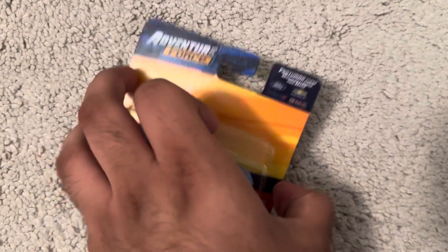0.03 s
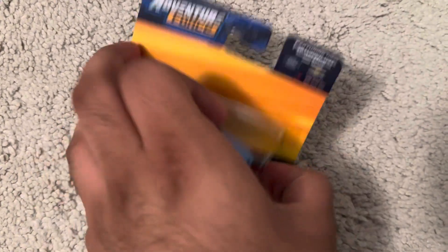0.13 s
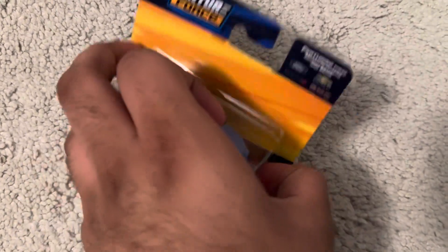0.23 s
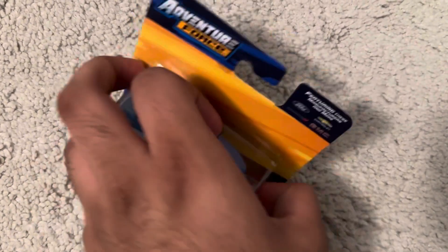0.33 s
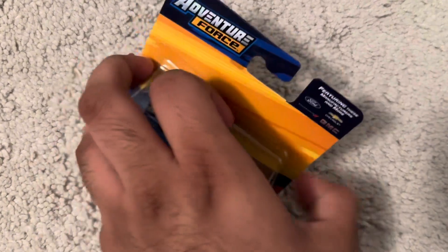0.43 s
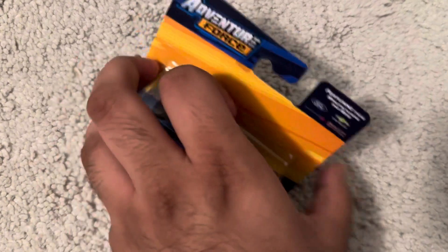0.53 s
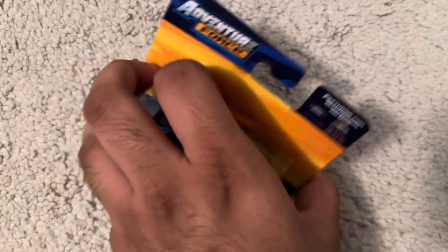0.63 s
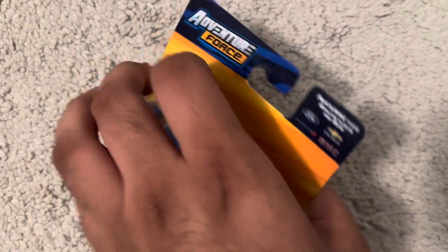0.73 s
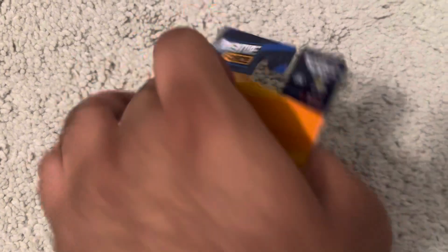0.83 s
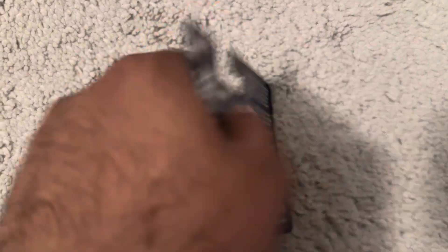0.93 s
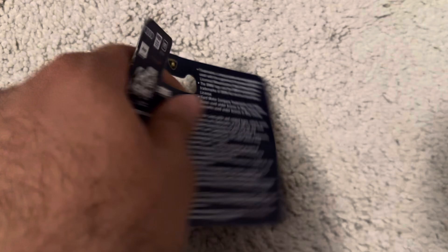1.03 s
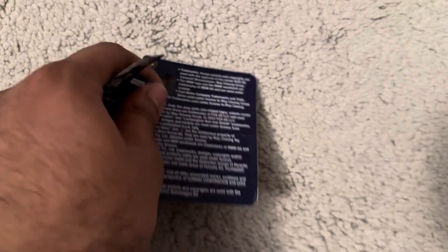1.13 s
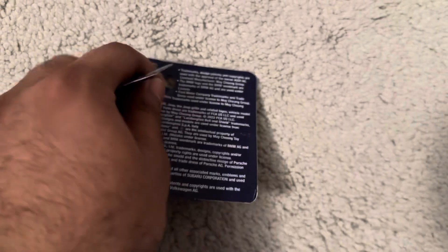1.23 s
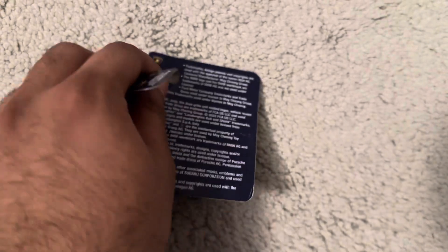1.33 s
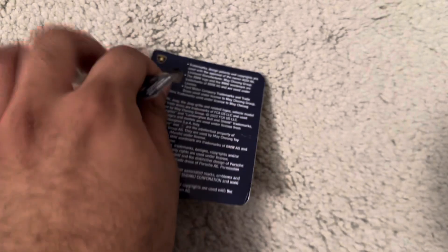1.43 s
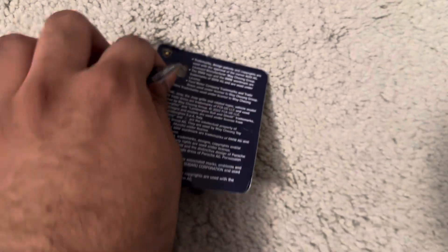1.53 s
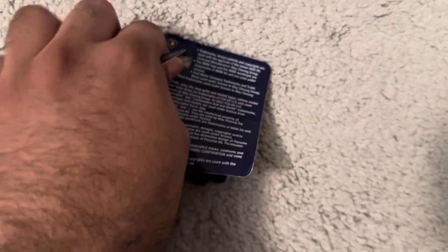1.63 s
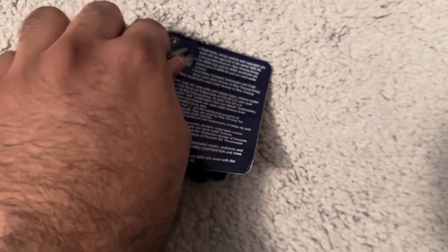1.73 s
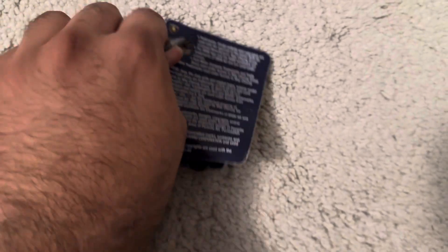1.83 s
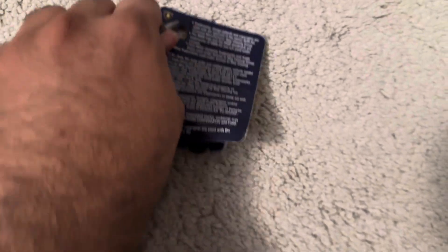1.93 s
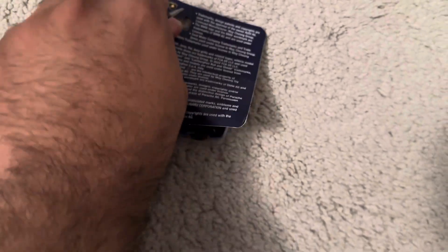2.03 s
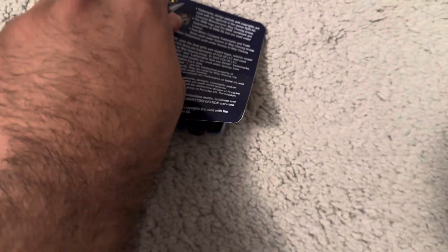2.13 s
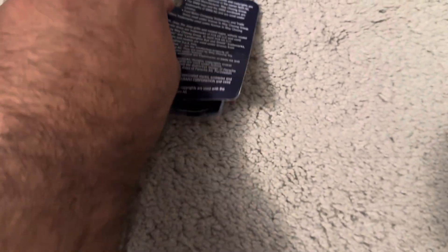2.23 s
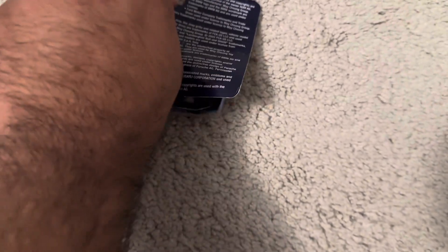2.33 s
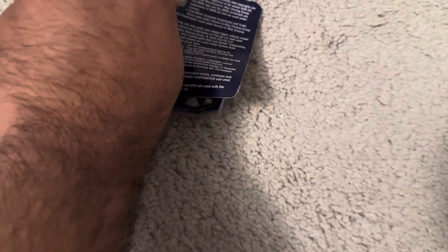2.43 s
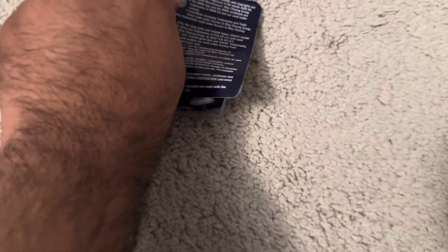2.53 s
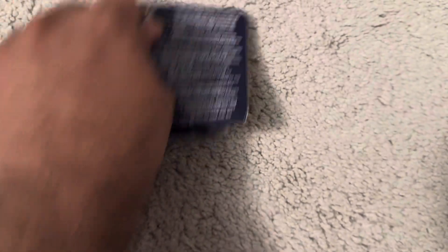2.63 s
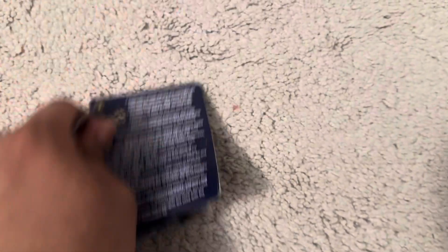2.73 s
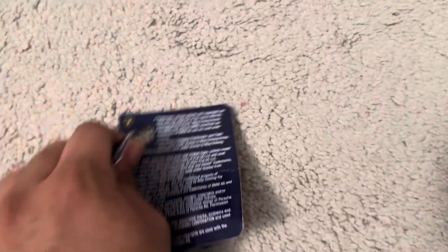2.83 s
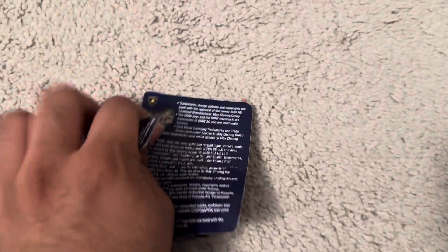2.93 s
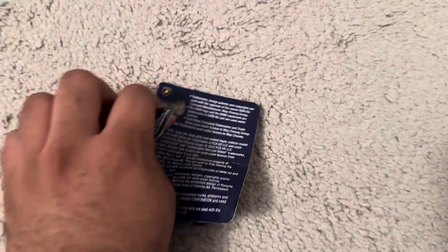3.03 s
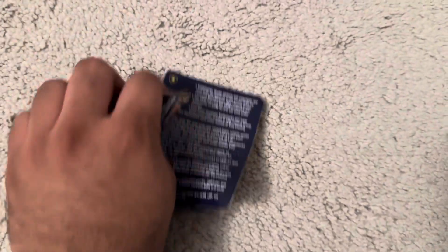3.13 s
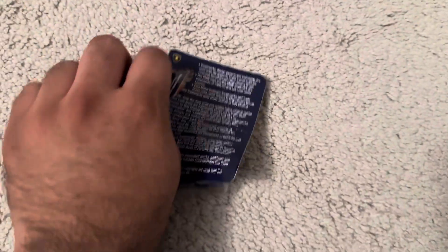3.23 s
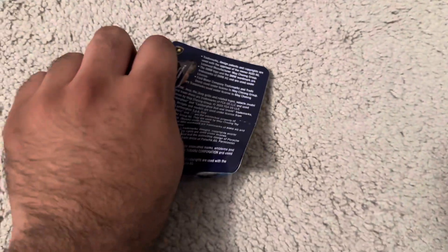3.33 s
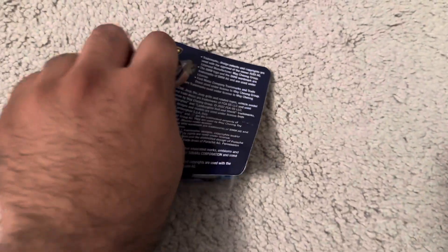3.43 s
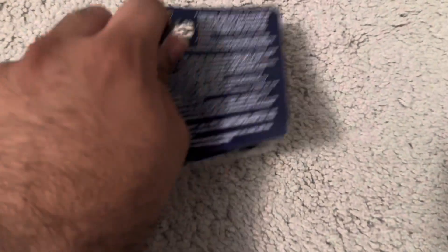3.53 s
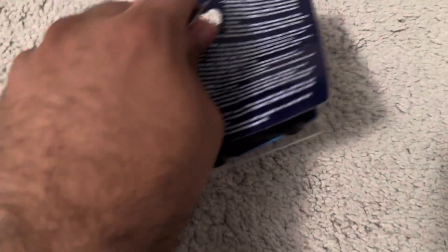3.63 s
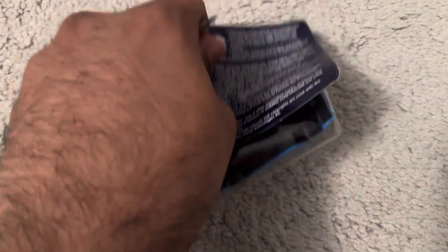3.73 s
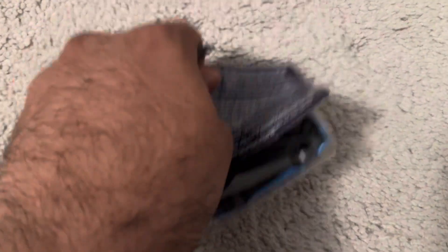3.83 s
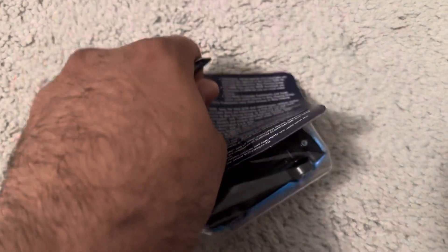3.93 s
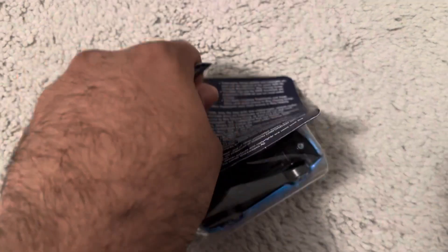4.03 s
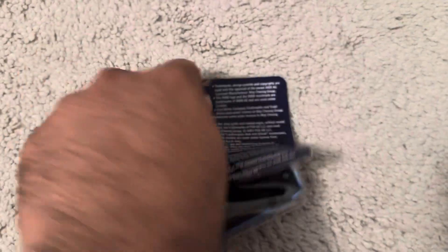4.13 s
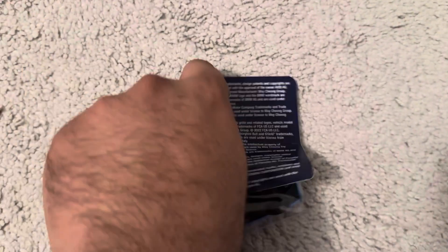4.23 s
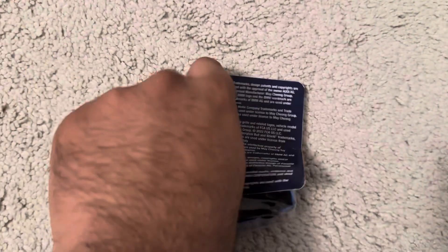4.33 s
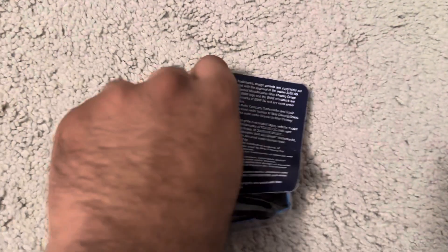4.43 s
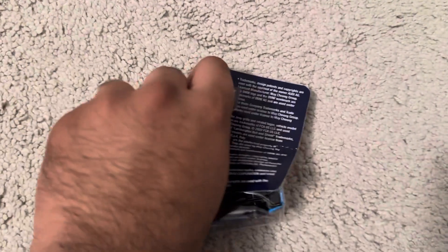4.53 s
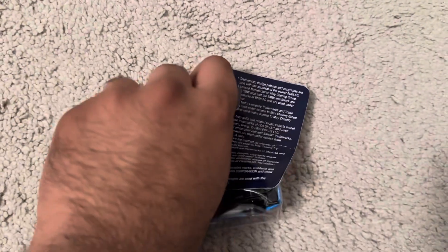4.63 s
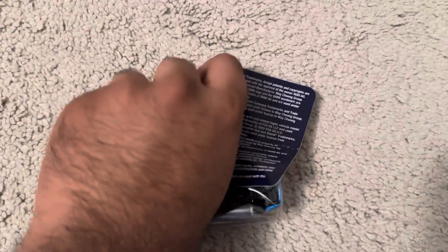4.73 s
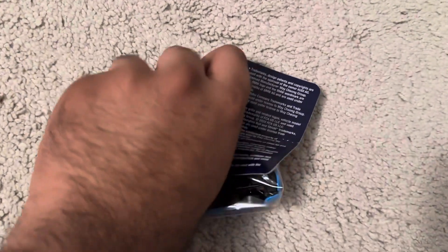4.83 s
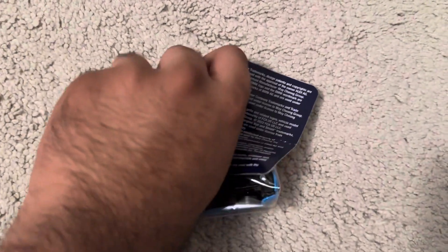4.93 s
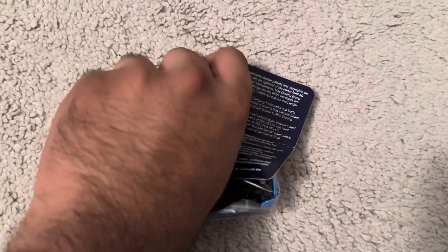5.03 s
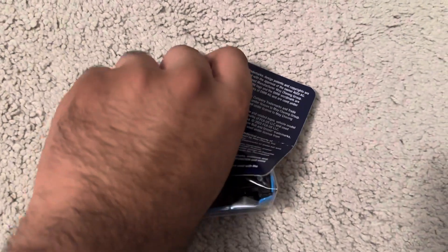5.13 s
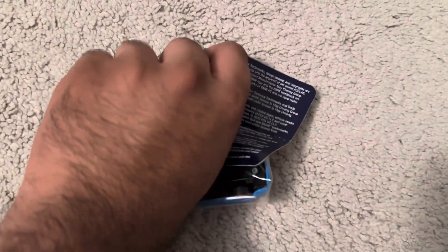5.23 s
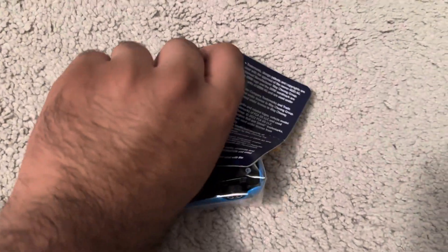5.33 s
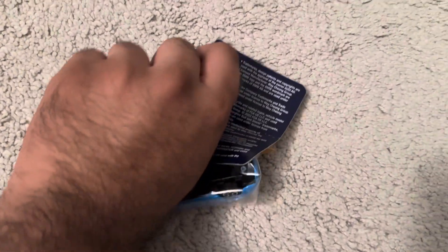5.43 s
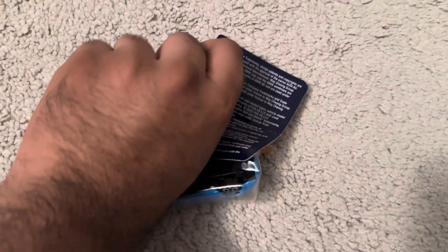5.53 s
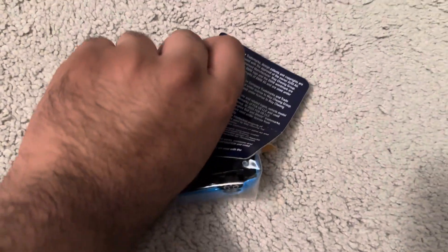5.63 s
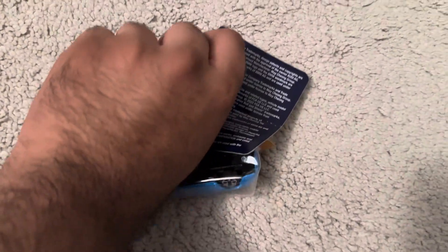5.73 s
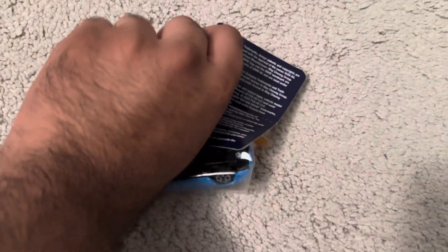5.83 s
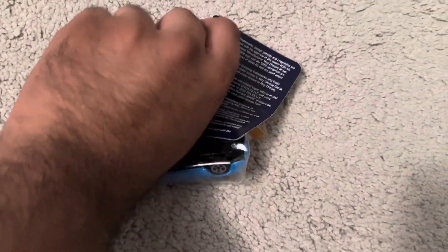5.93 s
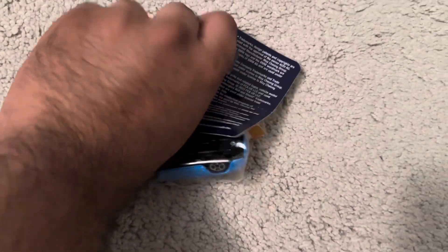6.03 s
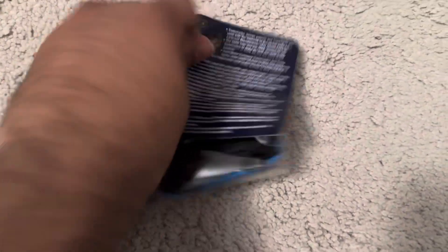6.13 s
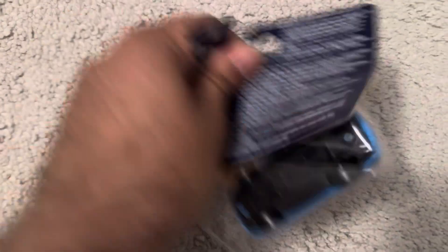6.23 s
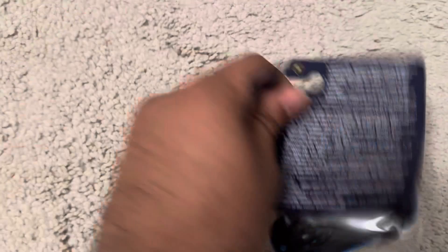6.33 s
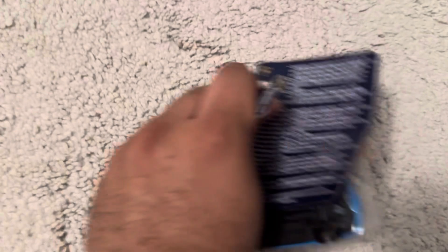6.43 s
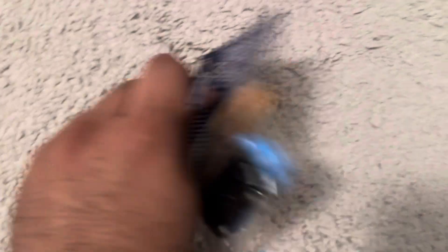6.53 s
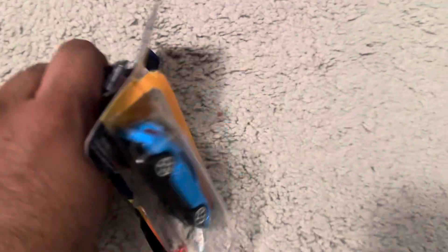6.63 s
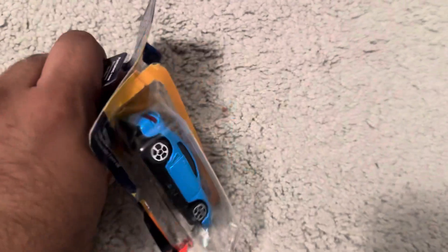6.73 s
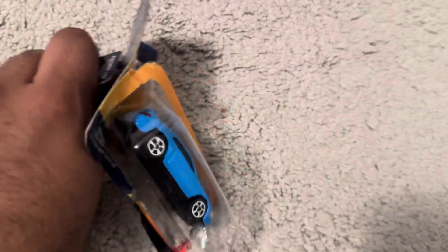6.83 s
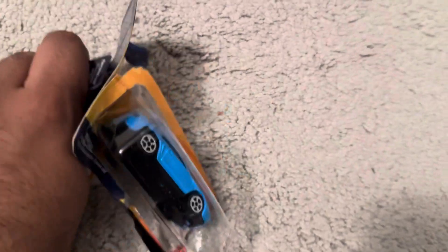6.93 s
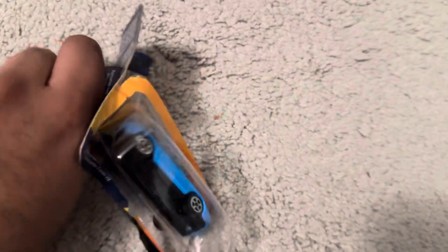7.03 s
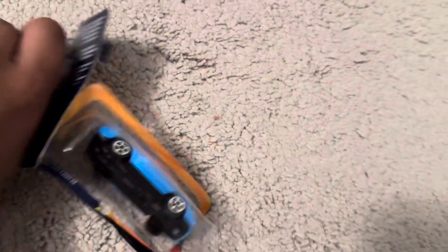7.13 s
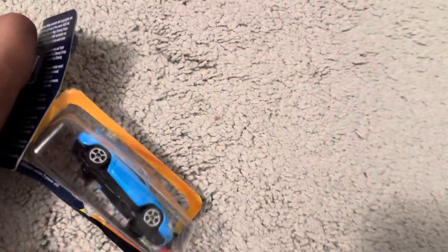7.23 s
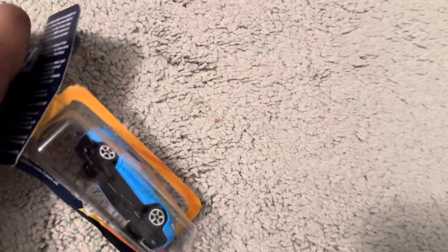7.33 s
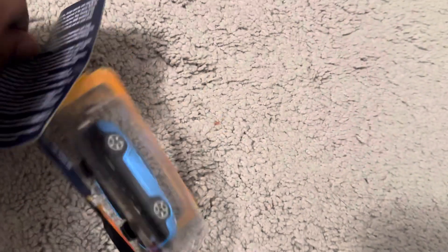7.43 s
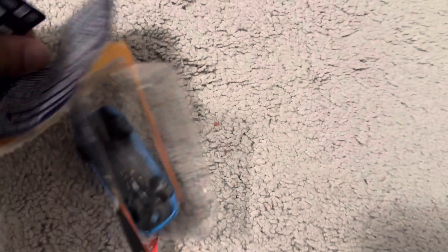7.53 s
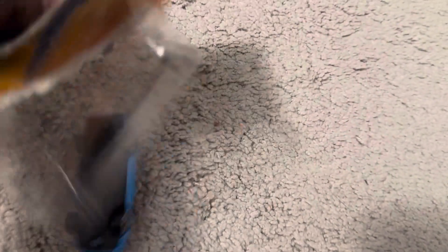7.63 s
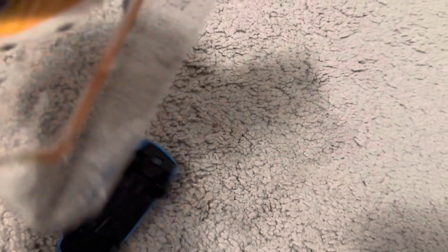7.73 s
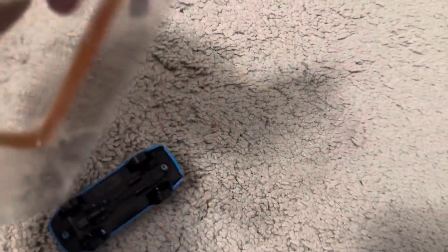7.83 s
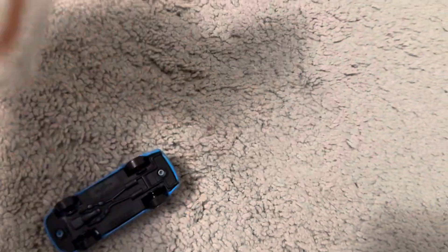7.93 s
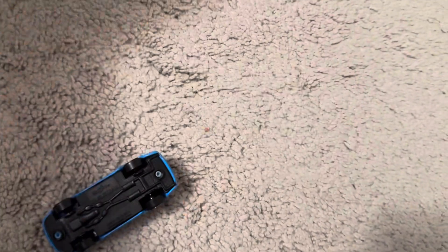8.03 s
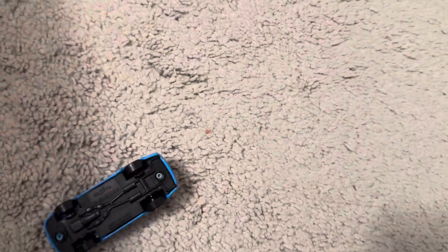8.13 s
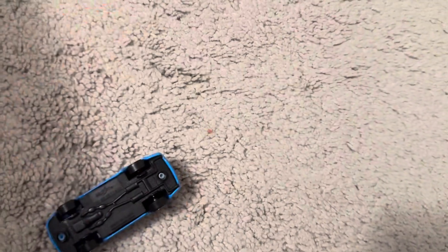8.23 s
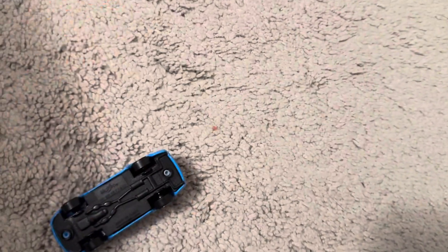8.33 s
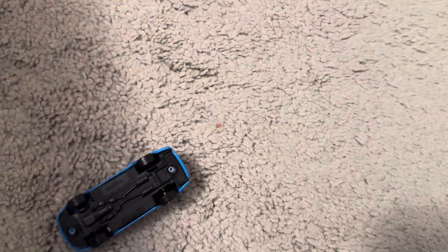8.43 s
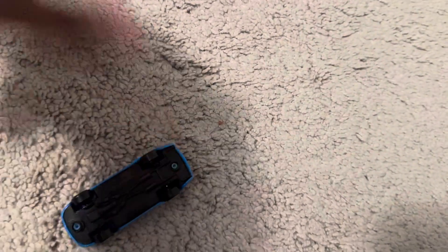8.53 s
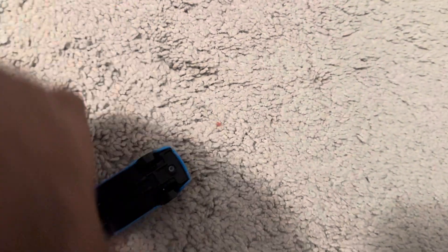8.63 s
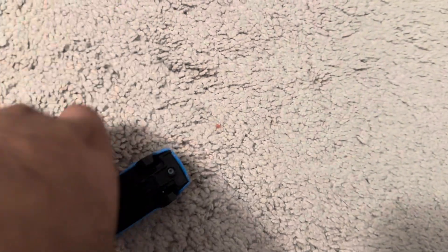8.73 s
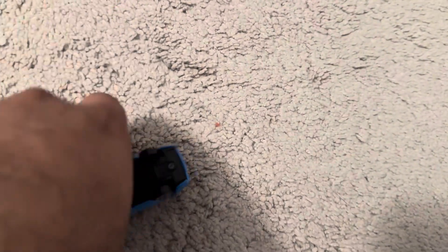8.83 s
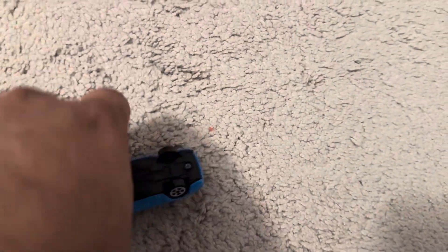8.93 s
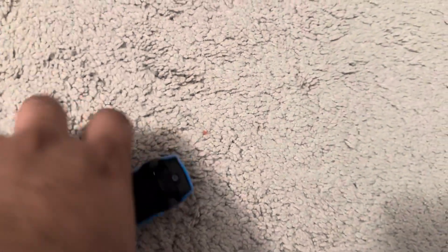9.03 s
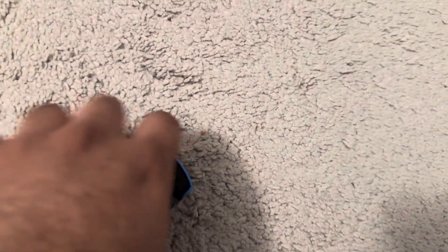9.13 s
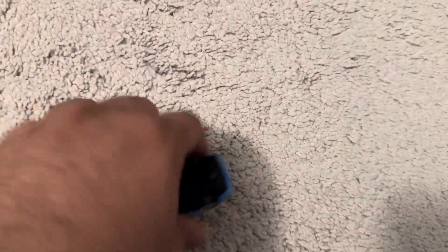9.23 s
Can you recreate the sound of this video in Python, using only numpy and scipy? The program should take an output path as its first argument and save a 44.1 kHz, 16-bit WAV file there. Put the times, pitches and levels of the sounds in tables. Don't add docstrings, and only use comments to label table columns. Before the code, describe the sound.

Stiff plastic packaging snaps and crackles sharply as card is torn and scraped over carpet, then a small toy car tumbles out and rattles.

```python
import sys
import numpy as np
from scipy import signal
from scipy.fft import rfft, irfft, next_fast_len
from scipy.io import wavfile
from scipy.ndimage import uniform_filter1d

SR = 44100
rng = np.random.default_rng(int(sys.argv[2]) if len(sys.argv) > 2 else 0)


def undo_db(level):
    steps = np.asarray(level, float) / 20
    return 10 ** steps


def bounce(signal):
    frames = np.transpose(np.atleast_2d(signal))
    limited = np.clip(frames, -1, 1)
    pcm = np.round(limited * 32767).astype(np.int16)
    wavfile.write(sys.argv[1], SR, pcm)


N = 409248

# (f/Hz, level/dB)
SHEET_COLOUR = [(88, -78.5), (150, -9.5), (830, -4.5), (2400, -5.5), (4510, -6.5), (6170, -10.5),
                (8290, -6.5), (9890, -17.5), (11600, -47), (13800, -20.5), (15600, -23), (16500, -56.5)]
SHEET_MODES = [(1000, 110, -21), (1820, 410, -21)]  # (f/Hz, width/Hz, level/dB)
SHEET_USUAL_DB = (-15, -18)


def evened(x):
    return x / np.sqrt(np.mean(x ** 2) + 1e-20)


def read(points, hz):
    f, value = np.transpose(points)
    return np.interp(np.log(hz + 1), np.log(f + 1), value)


def causal(gain_db):
    log_gain = np.log(undo_db(np.maximum(gain_db, -100)))
    circle = np.concatenate([log_gain, log_gain[-2:0:-1]])
    spectrum = np.exp(np.conj(signal.hilbert(circle)))
    return np.fft.ifft(spectrum).real[:len(log_gain)]


def ring(x, hz, width_hz):
    r = np.exp(-np.pi * width_hz / SR)
    pole = r * np.exp(2j * np.pi * hz / SR)
    return 2 * signal.lfilter([1 - r], [1, -pole], x).real


def noise(spectrum, same, patchy_db):
    frames, hz = N // 128 + 5, np.fft.rfftfreq(512, 1 / SR)
    a, b, c, d, patches = rng.standard_normal((frames, 257, 5)).T
    patches = evened(uniform_filter1d(uniform_filter1d(patches, 6, 0), 12, 1))
    patches = np.tanh(patches)
    same = np.clip(read(same, hz), -1, 1)[:, None]
    left, other = a + 1j * b, c + 1j * d
    z = np.array([left, same * left + np.sqrt(1 - same ** 2) * other])
    z = z * undo_db(read(spectrum, hz)[:, None] + patchy_db * patches)
    return evened(signal.istft(z, nperseg=512, noverlap=384)[1][:, :N])


def kind(rows, treble_db, bass_db, bass_db_per_octave):
    return [(s, db, hz, treble_db, bass_db + bass_db_per_octave * np.log2(hz / 1000), ms)
            for s, db, hz, ms in rows]


def snaps(rows, colour, modes, ring_db, q, lumpy_db, usual_db):
    size = 3072
    out, t_ms, hz = np.zeros(N + size), np.arange(size) / SR * 1000, np.fft.rfftfreq(2048, 1 / SR)
    treble = np.clip(np.log2(hz / 1500 + 1e-9) / 2, 0, 1)
    bass = np.clip(np.log2(800 / (hz + 1)), 0, 1)
    draws = rng.standard_normal((len(rows), 2, size))
    for (s, db, ring_hz, treble_db, bass_db, ms), (cracks, lumps) in zip(rows, draws):
        rise = 1 - np.exp(-t_ms / (0.47 + 0.2 * ms))
        fade = np.exp(-(t_ms / ms / 1.984) ** 1.67)
        uneven = undo_db(lumpy_db * evened(uniform_filter1d(lumps, size=30)))
        burst = rise * fade * cracks * uneven
        tilt_db = (treble_db - usual_db[0]) * treble + (bass_db - usual_db[1]) * bass
        crack = evened(signal.fftconvolve(burst, causal(read(colour, hz) + tilt_db))[:size])
        body = evened(ring(crack, ring_hz, ring_hz / q))
        for mode_hz, width_hz, mode_db in modes:
            body = body + undo_db(mode_db) * evened(ring(crack, mode_hz, width_hz))
        sound = crack + undo_db(ring_db) * evened(body)
        out[round(s * SR):][:size] += undo_db(db) * sound / abs(sound).max()
    return out[:N]


def hum():
    # (f/Hz, level/dB)
    hum_colour = [(12, -46.5), (20, -9), (79, -2), (131, -9.5), (305, 2), (966, -28.5), (2370, -20.5),
                  (7510, -33), (8170, -33), (9410, -38), (10200, -61), (13900, -44), (16500, -58.5)]
    # (f/Hz, correlation)
    likeness = [(60, 0.6), (180, 0.6), (550, 0.84), (1650, 0.32), (4970, 0.42), (15000, 0.61)]
    return undo_db(-57.5) * noise(hum_colour, likeness, patchy_db=6.0)


def pressure():
    # (t/s, card rub/dB, fibre hiss/dB)
    contact = [(0, -62, -68), (0.5, -62, -68), (1.3, -59, -62), (2.4, -59, -61), (4.3, -59, -59),
               (4.6, -70, -66), (5.1, -67, -62), (5.5, -58, -55), (6.8, -57, -59), (7.4, -63, -62),
               (8.5, -70, -72), (9.28, -71, -72)]
    # (peak t/s, 10 dB swell/s, 10 dB fade/s, card
    # rub/dB, fibre hiss/dB)
    strokes = [(0, .05, .07, -42, -54), (0.16, .07, .1, -42, -58), (0.82, .17, .09, -41, -43),
               (0.94, .04, .025, -33, -41), (1.06, .02, .02, -28, -52), (1.11, .05, .08, -54, -43),
               (1.33, .08, .14, -54.5, -50), (1.53, .11, .2, -59, -52), (1.871, .09, .12, -50, -51),
               (2.68, .08, .11, -44, -47.5), (2.899, .15, .25, -51.5, -48.5), (3.17, .13, .13, -51, -48),
               (3.62, .12, .16, -50, -46), (3.92, .3, .04, -44.5, -46), (4.2, .25, .2, -50.5, -54),
               (4.44, .1, .06, -51, -57), (4.76, .12, .2, -54, -57),
               (5.27, .07, .2, -51, -44.5), (5.72, .2, .12, -52, -48.5), (5.9, .12, .09, -49, -47),
               (6.16, .09, .4, -45, -48), (6.4, .2, .25, -41, -43), (6.541, .035, .11, -31.5, -33),
               (6.66, .1, .03, -50, -42), (7.18, .25, .02, -43.5, -44), (7.52, .04, .1, -48.5, -50),
               (7.67, .2, .1, -55, -53.5), (8.06, .03, .06, -54.5, -44), (8.25, .2, .13, -57, -61.5),
               (8.84, .08, .06, -73, -57), (9.04, .04, .03, -67, -52), (9.2, .06, .3, -63.5, -59.5)]
    t = np.arange(0, N + 64, 64) / SR
    s, *rest_db = np.transpose(contact)
    power = undo_db(2 * np.array([np.interp(t, s, db) for db in rest_db]))
    for peak, swell, fade, *top_db in strokes:
        slope_db = -10 * np.where(t < peak, (peak - t) / swell, (t - peak) / fade)
        power = power + undo_db(2 * np.maximum(np.array(top_db)[:, None] + slope_db, -150))
    return [np.interp(np.arange(N) / SR, t, 10 * np.log10(p)) for p in power]


def grains():
    catches = undo_db(6.0 * np.minimum(rng.exponential(1, N), 3)) * (rng.random(N) < 300 / SR)
    drag = evened(signal.oaconvolve(catches, np.exp(-np.arange(1200) / 270))[:N])
    crackle = evened(signal.oaconvolve(catches, np.exp(-np.arange(200) / 35))[:N])
    return evened(1.2 + 0.7 * drag + 0.37 * crackle)


def rubbing():
    # (f/Hz, level/dB)
    card_colour = [(88, -34.5), (150, -10.5), (689, -4), (759, -1), (1430, -5.5), (2410, -8.5),
                   (4000, -17.5), (5200, -30), (8800, -120)]
    # (f/Hz, level/dB)
    fibre_colour = [(1180, -6), (2000, -8.5), (2770, -3.5), (4920, -0.5), (5870, -2.5), (8820, 2),
                    (11900, -21), (12900, -15), (15100, -7), (16100, -18.5), (16500, -34.5)]
    card_db, hiss_db = pressure()
    card = undo_db(card_db) * grains() * noise(card_colour, [(1000, 0.45)], patchy_db=3.0)
    hiss = undo_db(hiss_db) * grains() * noise(fibre_colour, [(1000, 0.71)], patchy_db=4.0)
    floor_band = signal.butter(2, [42, 110], "band", fs=SR, output="sos")
    rumble = evened(signal.sosfilt(floor_band, rng.standard_normal(N)))
    rumble_db = -45 + 0.27 * uniform_filter1d(card_db, size=4000)
    return card + hiss, undo_db(rumble_db) * rumble


def at_ports(x):
    # (f/Hz, left-right/dB)
    tilt = [(100, 4.5), (300, 3), (700, 6), (2000, 3.5), (5000, 4), (9000, 1.5), (14000, 0.4)]
    # (f/Hz, left lead/rad)
    lead = [(250, 0.13), (550, 0.41), (950, 0.58), (1290, .5), (1550, 2.06), (1890, 0.34), (3360, 0.84),
            (5000, 0.88), (7320, 1.5), (8010, 4.87), (9000, 5.77), (13000, 4.95)]
    size = next_fast_len(N)
    hz, side = np.fft.rfftfreq(size, 1 / SR), np.array([[0.5], [-0.5]])
    ports = undo_db(read(tilt, hz) * side) * np.exp(1j * read(lead, hz) * side)
    return irfft(rfft(x, size) * ports, size)[:, :N]


def tears():
    # (t/s, peak/dB, ring f/Hz, length/ms)
    glue = [(0.103, -17.5, 766, 9.9), (0.119, -18, 520, 4.5), (0.305, -35, 700, 6.4),
            (0.377, -19.5, 930, 3), (0.459, -24.5, 424, 3.65), (0.681, -31, 1026, 8.2),
            (0.898, -12, 1800, 3.6), (0.977, -24, 664, 9.4), (1.017, -7.5, 890, 3.95),
            (1.043, -16.5, 1426, 5.7), (4.493, -17.5, 403, 5.0), (6.266, -21.5, 783, 7.5),
            (6.553, -10, 1096, 6.2), (6.567, -15.5, 848, 1.7), (6.735, -33.5, 395, 7.7)]
    # (t/s, peak/dB, ring f/Hz, length/ms)
    rips = [
        (0.179, -33.5, 985, 4.3),
        (1.074, -22, 1650, 4.2),
        (7.532, -27, 380, 9.1),
        (7.567, -19.5, 1040, 8.2),
        (7.585, -26.5, 5200, 4.2),
        (7.63, -23, 1864, 3.5),
        (8.091, -26.5, 3080, 5.0),
    ]
    rows = kind(glue, -19, -14.5, -0.6) + kind(rips, -6, -5, 1.5)
    return snaps(rows, SHEET_COLOUR, SHEET_MODES, ring_db=-5.5, q=7.7, lumpy_db=3.5, usual_db=SHEET_USUAL_DB)


def room(x, wet_db):
    # (f/Hz, t60/s)
    decay = [(200, 0.17), (1000, 0.31), (3000, 0.28), (8000, 0.39), (15000, 0.033)]
    # (delay/s, level/dB)
    echoes = [
        (0.0134, -14),
        (.021, -33),
        (.029, -23),
    ]
    taps = np.zeros((2, SR // 2))
    at = np.arange(200, SR // 2 - 20, 20) + rng.integers(0, 20, (2, (SR // 2 - 201) // 20))
    np.put_along_axis(taps, at, rng.choice([-1., 1.], at.shape), 1)
    hz, t, z = signal.stft(taps, SR, nperseg=256)
    tail = signal.istft(z * undo_db(-60 * t / read(decay, hz)[:, None]), SR, nperseg=256)[1]
    tail = tail * np.clip(np.arange(tail.shape[1]) / SR / 0.012, 0, 1)
    tail = undo_db(wet_db) * tail / np.linalg.norm(tail[0])
    for s, db in echoes:
        smear = rng.standard_normal((2, 130)) * np.exp(-np.arange(130) / 80)
        tail[:, round(s * SR):][:, :130] += undo_db(db) * smear / np.linalg.norm(smear[0])
    dull = signal.lfilter([0.55], [1, -0.45], x)
    return signal.fftconvolve(dull[None], tail, axes=1)[:, :N]


def buckles():
    # (t/s, peak/dB, ring f/Hz, length/ms)
    ticks = [
        (0.281, -18, 442, 0.97),
        (1.899, -6, 3480, 1.46),
        (2.408, -39.5, 877, 3),
        (3.674, -30, 1910, 3.2),
        (5.25, -25.5, 1350, 0.88),
        (6.478, -20, 1817, 2.6),
        (8.071, -19.5, 3070, 1.6),
    ]
    # (t/s, peak/dB, ring f/Hz, length/ms)
    cracks = [(0.242, -25.5, 436, 2.3), (0.613, -32.5, 1235, 1.6), (1.268, -9.5, 1880, 1.2),
              (1.298, -16.5, 2310, 0.67), (1.556, -12.5, 624, 2.46), (1.595, -6.5, 4970, 1.5),
              (2.553, -15, 988, 1.4), (2.993, -5.5, 1860, 1.38), (3.356, -25.5, 894, 2),
              (3.438, -3, 920, 2.4), (3.722, -11, 4600, 1.65), (3.774, -0.5, 1100, 2.16),
              (4.114, -4, 2860, 1.9), (4.847, -3, 3360, 1.1), (5.291, -26, 2500, 1.6),
              (6.083, -7.5, 1180, 1.14), (6.12, -5, 1670, 2), (6.194, -2, 970, 3.15),
              (6.238, -1, 1750, 2.8), (6.364, -13, 437, 0.91), (6.615, -21, 4910, 2)]
    # (t/s, peak/dB, ring f/Hz, length/ms)
    folds = [(0.836, -27, 2450, 2), (1.825, -23.5, 840, 2), (2.108, -6, 1420, 1.07),
             (2.196, -15, 1160, 1.7), (2.532, -7.5, 1300, 1.8), (2.936, -22.5, 853, 2.9),
             (3.128, -30, 3400, 1.5), (3.185, -25.5, 3640, 4.1), (3.216, -4, 990, 1.4),
             (4.471, -3, 955, 1.6), (5.975, -25, 960, 1.6), (6.356, -11.5, 3530, 1.9),
             (6.382, -5, 1967, 3.1), (6.402, -13, 2040, 1.9), (6.466, -38, 762, 1.8),
             (6.587, -3.5, 1740, 2)]
    # (t/s, peak/dB, ring f/Hz, length/ms)
    pops = [(0.782, -23.5, 740, 3.6), (1.352, -27, 2250, 3.8), (1.385, -24, 390, 1.9),
            (1.935, -17.5, 1750, 3), (2.175, -14, 945, 2.25), (2.29, -31, 840, 1.6),
            (2.48, -7.5, 1010, 1.9), (2.631, -12.5, 1140, 1.7), (2.835, -19.5, 656, 2.2),
            (2.957, -24.5, 1350, 2.4), (3.579, -22.5, 1830, 4.8), (3.769, -4.5, 1737, 1.68),
            (3.971, -36, 428, 2.6), (4.414, -31, 825, 1.8)]
    rows = kind(ticks, 0.1, -26, 8) + kind(cracks, -14, -21, -5)
    rows = rows + kind(folds, -21, -24, -4) + kind(pops, -33, -24, -11)
    return snaps(rows, SHEET_COLOUR, SHEET_MODES, ring_db=-5, q=6.8, lumpy_db=4.0, usual_db=SHEET_USUAL_DB)


def thuds():
    # (t/s, peak/dB, f/Hz)
    presses = [
        (1.429, -48, 37.7),
        (2.477, -36.5, 118),
        (2.701, -39, 80),
        (2.819, -40.5, 67.3),
        (3.499, -40.5, 39.4),
        (3.739, -41, 48.4),
        (4.049, -33, 53),
        (4.489, -42, 86.1),
        (6.249, -40, 68.6),
    ]
    out, t = np.zeros(N + 8000), np.arange(8000) / SR
    for s, db, hz in presses:
        swell = t / 0.015 * np.exp(1 - t / 0.014)
        out[round(s * SR):][:8000] += undo_db(db) * swell * np.sin(2 * np.pi * hz * t)
    return out[:N]


def pushes():
    # (t/s, peak/dB, ring f/Hz, length/ms)
    knocks = [
        (4.284, -27.5, 756, 12.6),
        (4.657, -37, 702, 9.3),
        (8.599, -47, 703, 4.4),
    ]
    # (t/s, peak/dB, ring f/Hz, length/ms)
    bumps = [
        (8.216, -22.5, 1550, 4.9),
        (8.345, -42, 330, 6.5),
    ]
    rows = kind(knocks, -32, -16, 0) + kind(bumps, -6, 3, -3)
    return snaps(rows, SHEET_COLOUR, SHEET_MODES, ring_db=17.0, q=12.0, lumpy_db=4.5, usual_db=SHEET_USUAL_DB)


def rattles():
    # (t/s, peak/dB, ring f/Hz, length/ms)
    hits = [(7.7257, -30.5, 6110, 9.5), (7.8236, -38, 3230, 8.8), (8.1165, -40.5, 4900, 5.2),
            (8.7839, -21, 3450, 5.5), (8.8208, -29.5, 4530, 2.5), (8.8691, -41, 5650, 6.0),
            (8.982, -28.5, 3210, 6.0), (9.0199, -34, 5250, 7.6), (9.0571, -40, 3360, 8.4),
            (9.084, -45, 5100, 5), (9.1387, -28, 4310, 4.8), (9.1651, -28, 5000, 6.0),
            (9.2075, -33.5, 5000, 6.0)]
    # (f/Hz, level/dB)
    car_colour = [(180, 5), (300, -11), (970, -78), (1430, 8.5), (2170, 6.5), (3410, 9), (3770, -4),
                  (8300, 1.5), (11000, -22), (13700, -13.5), (16500, -35.5)]
    # (f/Hz, width/Hz, level/dB)
    axle_modes = [(1420, 60, -9), (2700, 90, -9), (3350, 80, -5), (4310, 100, -5), (5160, 100, -5),
                  (6110, 90, -7), (6750, 90, -8), (8400, 200, -7)]
    rows = kind(hits, 6, -28, 0)
    return snaps(rows, car_colour, axle_modes, ring_db=7.5, q=13.0, lumpy_db=5.5, usual_db=(-15, -12))


def scene():
    rub, rumble = rubbing()
    hits = tears() + buckles() + pushes() + rattles()
    return at_ports(hits + rub) + room(hits, wet_db=-13.5) + rumble + thuds() + hum()


def top_cut(x):
    return signal.sosfilt(signal.butter(12, 16830, fs=SR, output="sos"), x)


def record(dry):
    hz, _, z = signal.stft(dry, SR, nperseg=1024)
    power = abs(z) ** 2
    level_db = 10 * np.log10(uniform_filter1d(power.mean(0), size=14, axis=0) + 1e-16)
    open_db = read([(9300, -115), (10400, -73), (12000, -91), (12900, -103), (16000, -100)], hz)[:, None]
    shut_db = -40 * np.clip((open_db - level_db) / 3, 0, 1) * (hz > 9000)[:, None]
    loud_db = 10 * np.log10(power.sum((0, 1)) + 1e-12)
    jump_db = np.diff(loud_db, prepend=0)
    shut_db = shut_db * np.clip((9.5 - jump_db) / 2, 0, 1)
    thinned = signal.istft(z * undo_db(shut_db), SR, nperseg=1024)[1][:, :N]
    return top_cut(np.clip(thinned, -1, 1))


dry = scene()
out = record(dry)
bounce(out)
```